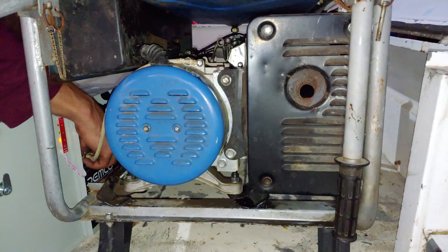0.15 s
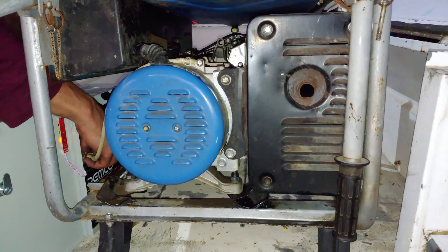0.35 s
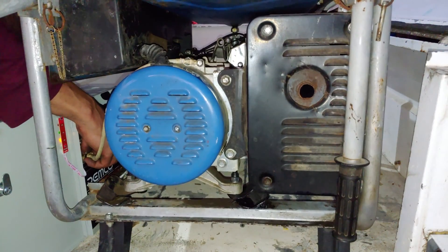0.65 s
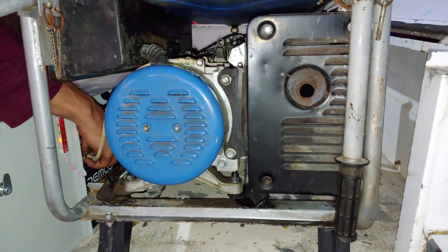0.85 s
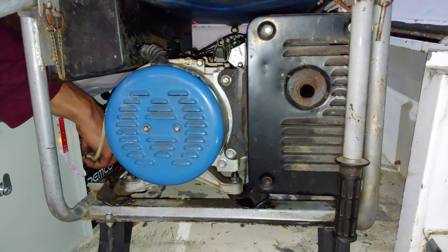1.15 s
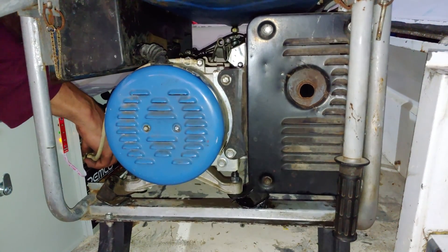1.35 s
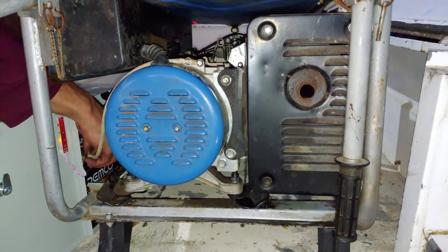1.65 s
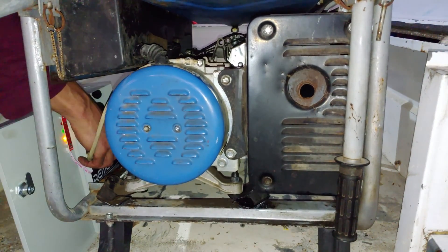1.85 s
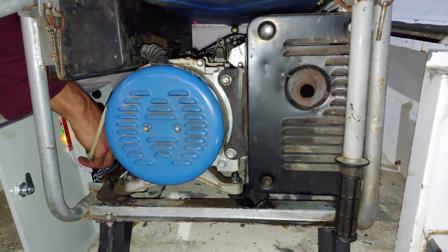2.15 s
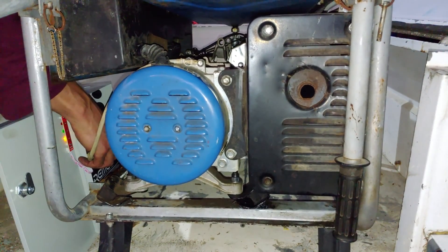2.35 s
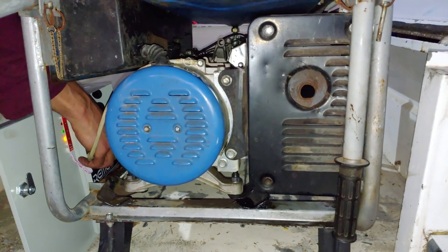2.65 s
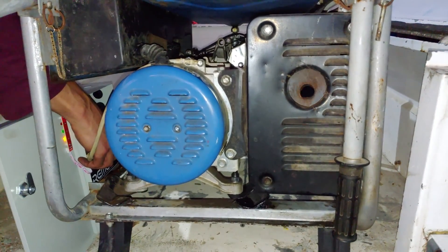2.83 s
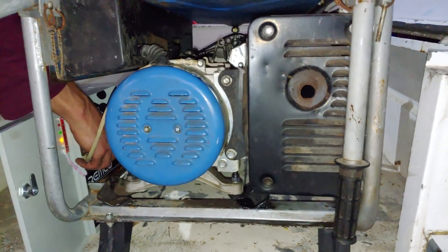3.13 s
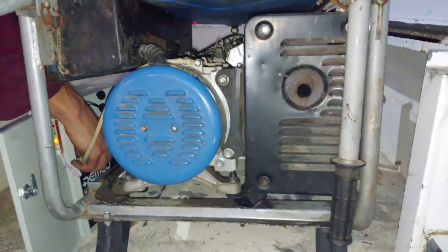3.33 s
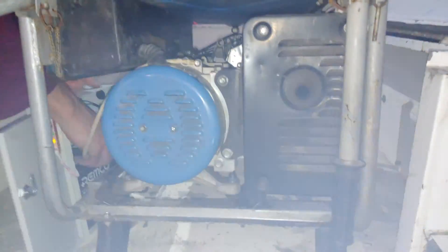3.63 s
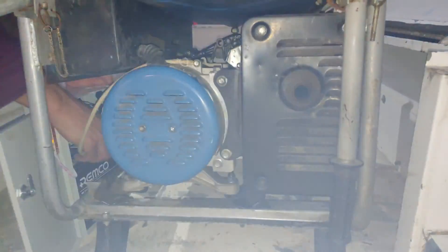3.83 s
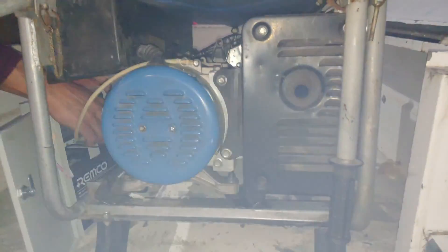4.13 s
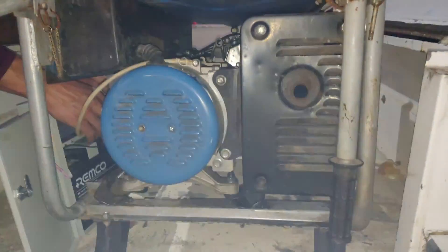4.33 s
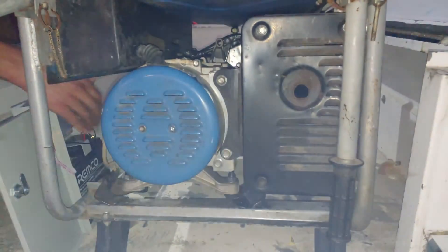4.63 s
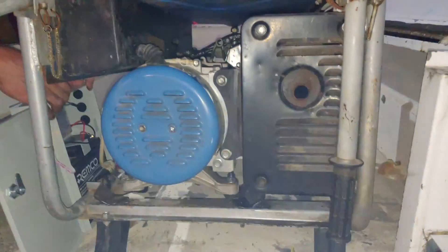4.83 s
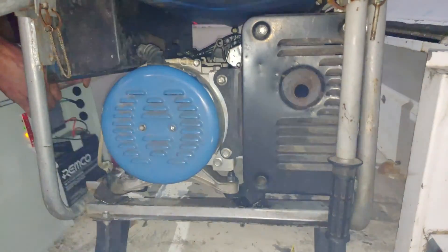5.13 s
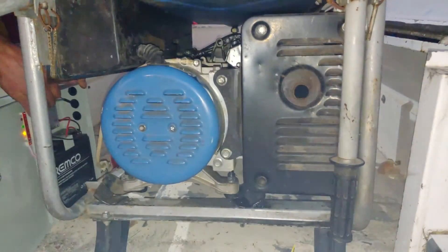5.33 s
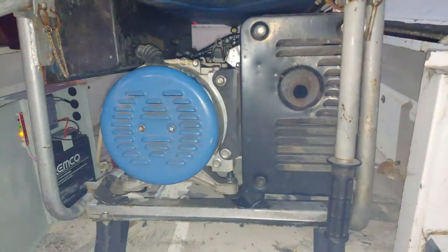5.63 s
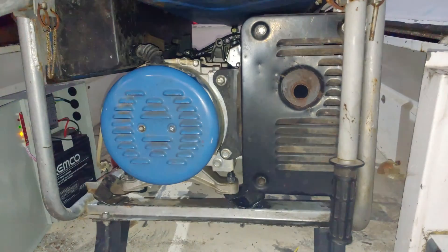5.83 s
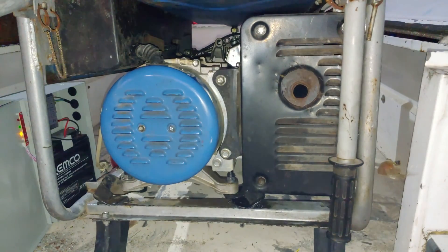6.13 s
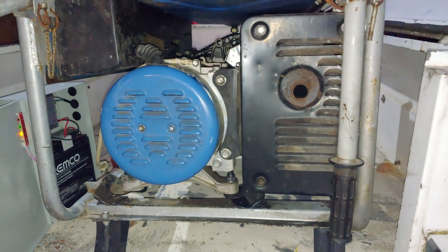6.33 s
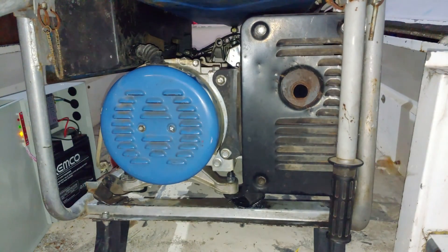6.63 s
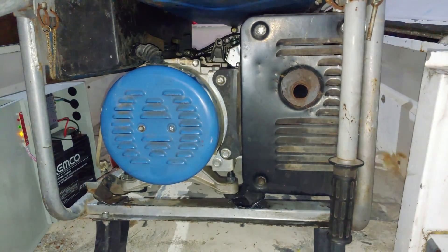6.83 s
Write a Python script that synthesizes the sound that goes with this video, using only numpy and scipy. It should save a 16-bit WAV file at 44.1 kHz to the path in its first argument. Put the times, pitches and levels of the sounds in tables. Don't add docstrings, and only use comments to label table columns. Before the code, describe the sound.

Close up outdoors, a starter motor cranks twice before a small engine fires, blasts buffeting exhaust puffs, misfires, then settles into a steady rapid run.

```python
import sys
import numpy as np
from scipy import signal
from scipy.fft import rfft, irfft, next_fast_len
from scipy.io import wavfile
from scipy.ndimage import uniform_filter1d, minimum_filter1d, map_coordinates

SR = 44100
rng = np.random.default_rng(int(sys.argv[2]) if len(sys.argv) > 2 else 0)


def ratio(d):
    e = np.asarray(d, float) / 20
    return 10 ** e


def to_wav(sig):
    pcm = np.clip(np.atleast_2d(sig), -1, 1) * 32767
    pcm = np.round(pcm).astype(np.int16)
    wavfile.write(sys.argv[1], SR, pcm.T)


N = 307818
T = np.arange(N) / SR


def unit(x):
    return x / np.sqrt(np.mean(x ** 2) + 1e-20)


def along(points, hz):
    f, v = np.transpose(points)
    return np.interp(np.log(hz + 1), np.log(f + 1), v)


def curves(rows):
    s, *cols = np.transpose(rows)
    inside = (T > s[0] - 1e-3) & (T < s[-1] + 1e-3)
    on = uniform_filter1d(1. * inside, size=200, mode="nearest")
    return [np.interp(T, s, c) for c in cols] + [on]


def wobble(rate):
    knots = rng.standard_normal(int(N * rate / SR) + 4)
    return unit(map_coordinates(knots, [T * rate]))


def filtered(x, response):
    m = next_fast_len(N + SR // 4)
    return irfft(rfft(x, m) * response(np.fft.rfftfreq(m, 1 / SR)), m)[..., :N]


def shaped(x, spectrum):
    return unit(filtered(x, lambda hz: ratio(along(spectrum, hz))))


def modes(table, f):
    total = 0
    for k, (centre, width, db) in enumerate(table):
        damping = 1j * f * width
        total = total + (-1) ** k * ratio(db) * damping / (centre * centre - f * f + damping)
    return total


def pair(alike):
    a, b = rng.standard_normal((2, N))
    turn = np.arccos(np.clip(alike, 0, 1)) / 2
    return np.array([np.cos(turn) * a + np.sin(turn) * b, np.cos(turn) * a - np.sin(turn) * b])


def bursts(times, db, rise, t60):
    t = np.arange(SR // 5) / SR
    shape = (1 - np.exp(-t / rise)) ** 2 * ratio(-60 * t / t60)
    out = np.zeros(N + len(t))
    starts = (np.asarray(times) * SR).astype(int)
    for start, gain in zip(starts, ratio(db) / shape.max()):
        out[start:start + len(t)] += gain * shape
    return out[:N]


# start in seconds, jet level in dB, puff level in dB, travel of the puff in seconds.
CATCHING = [(3.392, -24.5, -7.5, .026), (3.4642, -25, -4, .023), (3.528, -26.5, 0, .028),
            (3.5895, -25, -4.5, 0.032), (3.6512, -22, 3, 0.019), (3.7061, -28, -5, 0.0266),
            (3.76, -25, -2.5, 0.028), (3.814, -25.5, -4, 0.024), (3.8654, -37, -21, 0.039),
            (3.913, -25.5, -4, 0.017)]
LIMPING = [(4.005, -24, -5.5, .033), (4.0969, -20.5, -6, .023), (4.185, -20, -10.5, 0.0292),
           (4.272, -20.5, -1.5, 0.025), (4.3531, -25, -1, .032), (4.4365, -20.5, -9.5, 0.025),
           (4.52, -24, -10, 0.027), (4.6035, -22.5, -7, 0.037), (4.6445, -25.5, -10, 0.024),
           (4.6836, -25.5, -9.5, .034), (4.7685, -20.5, -8, 0.028), (4.851, -21.5, -8, 0.032),
           (4.9321, -20, -10.5, .031), (5.0149, -20.5, -5.5, .027), (5.0988, -22.5, -8.5, .027),
           (5.18, -22.5, -9.5, .031), (5.2612, -19.5, -8.5, 0.032), (5.342, -23, -12, .03),
           (5.4239, -20.5, -7.5, 0.029), (5.505, -25.5, -13, .034), (5.5859, -21, -5.5, .033),
           (5.6696, -22.5, -7.5, 0.031), (5.707, -22.5, -10, .044), (5.7482, -25, -9.5, 0.047),
           (5.7841, -25.5, -9.5, 0.063), (5.8235, -25.5, -14, 0.048), (5.862, -23.5, -32, 0.066)]


def strokes():
    return np.transpose(CATCHING + LIMPING)


def even_beat():
    firings_per_s, jet_db, rise_db_per_s = 26.15, -27.5, 4.5
    times = np.arange(5.939, N / SR, 1 / firings_per_s)
    scatter_db = 3.8 * rng.standard_normal(len(times))
    return times, jet_db + rise_db_per_s * (times - times[0]) + scatter_db


# time in seconds, level in dB.
THROAT = [
    (3.4, 14.5),
    (4.1, 17),
    (5.5, -2),
    (5.8, -16),
]
# frequency in Hz, level in dB.
JET = [(1500, 4.5), (2500, -2.5), (3300, -5), (4400, -1), (6000, -8), (7600, -6.5), (9200, -18.5),
       (12000, -18.5), (13500, -30), (15500, -22), (17000, -64)]
# frequency in Hz, level in dB.
CASING = [(180, -17.5), (300, -5.5), (344, 0.5), (386, -4), (451, -1), (585, -4), (683, 0.5), (954, -2.5),
          (1060, -0.5), (1330, -5), (1760, -7.5), (1930, -10.5), (2600, -22.5), (3380, -25.5), (5720, -120)]


def exhaust(beat_s, beat_db):
    s, db = strokes()[:2]
    times, level = np.r_[s, beat_s], np.r_[db, beat_db]
    hiss = bursts(times, level - 11.5, rise=0.0022, t60=0.044)
    hiss += bursts(times, level - 13.5, rise=0.016, t60=0.053)
    hiss += bursts(s, db - 6, rise=.0002, t60=.016)
    early = s < 5.65
    second_hiss = bursts(s[early] + 0.05, db[early] - 23, rise=0.003, t60=0.14)

    jet = shaped(pair(0.67) * ratio(1.3 * wobble(900)), JET)
    sizzle_db, dry_db_per_s = 15, -11
    sizzle = filtered(jet, lambda f: 1 / (1 + (8000 / (f + 1)) ** 6))
    jet = jet + ratio(sizzle_db + dry_db_per_s * np.maximum(T - s[0], 0)) * sizzle

    low_db = np.interp(s, *np.transpose(THROAT))
    throat = bursts(s, db + low_db - 21.5, rise=0.006, t60=0.25)
    return (hiss + second_hiss) * jet + throat * shaped(pair(0.54), CASING)


# arrival of the front in seconds, level in dB, left-right difference in dB.
PUMPED = [(0.094, -15, -15.5), (0.213, -6, -7), (0.332, -13, -16), (0.46, -10, -10), (0.579, -8, -6),
          (0.704, -7.5, -1.5), (.826, -7, -6), (0.953, -3, 2), (1.098, -14, -4), (1.203, -6, -3),
          (1.34, -16.5, -13), (1.478, -8.5, 0), (1.59, -7, -2), (1.697, -1.5, 1), (1.829, -11, -2.5),
          (2.726, -14, 8), (2.856, -22.5, 27), (2.936, -16.5, 16), (3.154, -16.5, 26), (3.272, -3.5, 0),
          (3.344, -8.5, -3)]
# time in seconds, level in dB.
STRAY = [
    (6.062, -22.5),
    (6.306, -25),
    (6.413, -19.5),
    (6.463, -27),
    (6.635, -23.5),
    (6.754, -22),
]


def puffs():
    cold_sharp_db, hot_sharp_db, sharp_scatter_db, lean_scatter_db = -15.5, -3.5, 2, 2.5
    s, _, db, travel = strokes()
    cold_s, cold_db, cold_lean = np.transpose(PUMPED)
    late_s, late_db = np.transpose(STRAY)
    hot_s, hot_db = np.r_[s + travel, late_s], np.r_[db, late_db]
    draw = rng.standard_normal((len(cold_s) + len(hot_s), 2))
    lean = np.r_[cold_lean, -.8 + lean_scatter_db * draw[len(cold_s):, 0]]
    sharp = np.r_[cold_sharp_db + 0 * cold_s, hot_sharp_db + 0 * hot_s]
    sharp = sharp + sharp_scatter_db * draw[:, 1]
    return np.r_[cold_s, hot_s], np.r_[cold_db, hot_db], lean, sharp


def swirls(s, db, lean_db, sharp_db, alike):
    t = np.arange(SR // 12) / SR
    swell = (t / 0.01) ** 2 * np.exp(2 - 2 * t / 0.0098)
    draw = rng.standard_normal((len(s), 6))
    out = np.zeros((2, N + len(t)))
    for row in range(len(s)):
        start = int((s[row] - .008) * SR)
        for port, side in enumerate((.5, -.5)):
            own = (1 - alike[row]) * draw[row, 3 + port]
            pitch_db = 0.363 * min(sharp_db[row], -3) + 1.68 * draw[row, 0] + 1.5 * own
            hz = 55 + 520 * ratio(pitch_db) * np.exp(-t / 0.00818)
            phase = 2 * np.pi * np.cumsum(hz) / SR + 2 * draw[row, 1] + 0.93 * own
            gain = ratio(db[row] + side * lean_db[row] - 2.0)
            out[port, start:start + len(t)] += gain * swell * np.sin(phase)
    return out[:, :N]


# time in seconds, left-right likeness from 0 to 1.
PUFF_ALIKE = [
    (0, 0.31),
    (3.2, 0.51),
    (3.8, 0.15),
    (4.8, 0.98),
    (6.98, 0.85),
]
# frequency in Hz, level in dB.
THUD = [(15, -35.5), (35, -4), (70, -1.5), (120, -5), (200, -10), (350, -24.5), (700, -66)]
# frequency in Hz, level in dB.
SNAP = [(100, -32), (220, 0.5), (350, -1), (550, -8), (900, -13), (1600, -34.5), (4000, -72.5)]
# time in seconds, level in dB.
DRAUGHT = [
    [(0.0, -29), (1.8, -35.5), (1.9, -65)],
    [(2.6, -41), (3.1, -24.5), (3.2, -21), (3.33, -12), (3.37, -23.5), (3.6, -12.5), (4.6, -21),
     (5.75, -17.5), (6.1, -36), (6.55, -26.5), (6.98, -29)],
]


def buffet():
    s, db, lean_db, sharp_db = puffs()
    alike = curves(PUFF_ALIKE)[0]
    thud = shaped(pair(alike) * ratio(2.5 * wobble(70)), THUD)
    snap = shaped(pair(alike) * ratio(3.0 * wobble(120)), SNAP)
    thud = unit(thud + 0.17 * filtered(thud ** 2, lambda f: f / (f + 40)))
    slow, quick = [], []
    for side in (.5, -.5):
        port_db = db + side * lean_db
        slow.append(bursts(s - .004, port_db - 6, rise=0.004, t60=0.1))
        quick.append(bursts(s - .004, port_db + sharp_db - 4.5, rise=0.0015, t60=0.099))
    rest = sum(on * ratio(level + 4) for level, on in map(curves, DRAUGHT))
    ring = swirls(s, db, lean_db, sharp_db, alike[(s * SR).astype(int)])
    stroke_s = strokes()[0]
    lull = bursts(stroke_s - .018, 0 * stroke_s, rise=.012, t60=.2)
    calm = 1 - .87 * np.minimum(lull, 1)
    return ring + calm * (np.array(slow) + rest) * thud + (np.array(quick) + 0.21 * calm * rest) * snap


def rings(table, rise, t60, sag):
    t = np.arange(SR // 20) / SR
    out = np.zeros(N + len(t))
    shape = (1 - np.exp(-t / rise)) * ratio(-60 * t / t60)
    shape = shape / shape.max()
    for (s, db, hz), chance in zip(table, rng.random(len(table))):
        turns = np.cumsum(hz * np.exp(-sag * t)) / SR
        out[int(s * SR):][:len(t)] += ratio(db) * shape * np.sin(2 * np.pi * (turns + chance))
    return out[:N]


# start in seconds, peak in dB, pitch in Hz.
SLAPS = [(3.414, -8.5, 301), (3.485, -14, 428), (3.554, -5.5, 312), (3.613, -9, 301), (3.669, 1, 540),
         (3.728, -17, 306), (3.786, -15, 390), (3.835, -17.5, 430), (3.901, -22, 452), (3.944, -15, 323),
         (3.997, -18.5, 477), (4.037, -11, 410), (4.088, -17, 473), (4.117, -16, 308), (4.21, -10, 401),
         (4.293, -7, 420), (4.34, -17, 370), (4.381, -16, 511), (4.44, -27, 328), (4.461, -13, 301),
         (4.546, -27, 357), (4.614, -20, 356), (4.639, -19, 490), (4.666, -15, 304), (4.716, -13.5, 383),
         (4.793, -16, 365), (4.885, -9.5, 338), (4.959, -13, 380), (5.041, -9, 360), (5.108, -27, 355),
         (5.126, -13.5, 370), (5.209, -9.5, 316), (5.295, -5, 318), (5.347, -28, 1050), (5.371, -10, 457),
         (5.456, -9, 425), (5.536, -12, 470), (5.604, -12.5, 318), (5.67, -26, 331), (5.695, -21, 510),
         (5.739, -21.5, 345), (5.79, -20, 367), (5.83, -19, 347), (5.895, -24, 520)]
# start in seconds, peak in dB, pitch in Hz.
PIPE = [(3.4632, -25, 1180), (3.5302, -27, 1117), (3.564, -18, 1150), (3.7683, -34, 1285),
        (3.9143, -22, 1290), (4.0091, -16, 1290), (4.0689, -23, 1270), (4.098, -13, 1270),
        (4.1852, -17, 1250), (4.2111, -16, 1130), (4.2435, -27, 1340), (4.271, -21, 1300),
        (4.3584, -20, 1174), (4.463, -25, 1320), (4.493, -29, 1153), (4.6042, -33, 1245),
        (4.7394, -24, 1250), (4.7698, -19, 1220), (4.8516, -21, 1176), (4.9345, -23, 1250),
        (5.0154, -18.5, 1147), (5.2617, -19, 1126), (5.3735, -17, 1100), (5.4222, -22, 1224),
        (5.4867, -33, 1180), (5.585, -27, 1200), (5.609, -16.5, 1450), (5.6676, -23, 1180),
        (5.8718, -21, 1280), (5.9013, -26, 1100)]


def knocks():
    fronts = [(s, db, 1.573 * hz) for s, db, hz in SLAPS]
    shared = rings(fronts, rise=.0003, t60=.028, sag=70)
    own = rings(fronts, rise=.0003, t60=.028, sag=70)
    slap = np.array([shared + 0.38 * own, shared - 0.44 * own])
    return ratio(1.0) * slap + ratio(-3.0) * rings(PIPE, rise=0.00067, t60=0.045, sag=1.5)


def armature():
    stroke = (T - .19) / .2475 % 1
    sag = uniform_filter1d(np.exp(-stroke / .4), size=900)
    turns_per_s = 60.8 - 7 * sag + .3 * wobble(10)
    return np.cumsum(turns_per_s) / SR


# frequency in Hz, left-right difference in dB.
STARTER_LEAN = [(60, -2.5), (110, -7), (190, 4), (350, -1), (620, -1.5), (1120, -5), (2010, 5),
                (3620, -3.5), (6490, 6.5), (11700, -3.5)]
# frequency in Hz, left-right difference in radians.
STARTER_LEAD = [(1500, 0), (1810, .3), (2580, -1.4), (3620, 2), (4050, -.3), (5680, .4), (6550, 2.5),
                (8100, 0), (10600, 3)]


def place(f):
    side = np.array([[.5], [-.5]])
    return ratio(side * along(STARTER_LEAN, f)) * np.exp(1j * side * along(STARTER_LEAD, f))


# frequency in Hz, width in Hz, level in dB.
HOUSING = [(408, 30, -12), (530, 15, -15), (770, 60, -5.5), (842, 30, -7), (905, 40, -11), (1046, 28, -8),
           (1266, 16, -5), (1552, 11, 1.5), (1605, 28, -5), (1739, 17, 4), (1833, 18, -2), (2100, 40, -14),
           (2379, 26, -11)]
# frequency in Hz, level in dB.
BROAD = [(200, -49), (380, -20), (600, -17), (1000, -13), (2000, -15), (2500, -16.5), (3600, -45.5)]


def housing(f):
    return place(f) * (modes(HOUSING, f) * f ** 2 / (f ** 2 + 350 ** 2) + ratio(along(BROAD, f)))


# frequency in Hz, width in Hz, level in dB.
RATTLE = [(3140, 30, -1), (3215, 40, 0), (3430, 40, -1), (3706, 35, -3), (3880, 140, -2), (4230, 51, -4),
          (4690, 90, -3), (5100, 35, -4), (5562, 50, -1.5), (5666, 40, -1), (5930, 43, -9), (6540, 120, 0),
          (6900, 52, -5), (7710, 60, -9)]
# frequency in Hz, level in dB.
BROAD_HIGH = [(2000, -54), (2800, -17), (5000, -18), (8000, -20.5), (11500, -29), (12400, -56),
              (14500, -24), (16000, -79.5)]


def rattle(f):
    floor_db = along(BROAD_HIGH, f)
    return place(f) * (modes(RATTLE, f) * ratio(floor_db + 12.0) + ratio(floor_db))


def first_try(body, bright):
    let_go_s, coast_db_per_s = 1.783, -130
    stop_s, stop_db_per_s = 1.903, -9000
    fade_s, fade_db_per_s = 1.86, -53
    level_db = -16.5 - 0.75 * T
    level_db = level_db + coast_db_per_s * np.maximum(T - let_go_s, 0)
    level_db = level_db + stop_db_per_s * np.maximum(T - stop_s, 0)
    bright_db = -2.5 + fade_db_per_s * np.maximum(T - fade_s, 0)
    return ratio(level_db) * (body + ratio(bright_db) * bright)


# time in seconds, housing level in dB, bright rattle relative to it in dB.
SECOND_TRY = [
    (2.3, -39.5, -9),
    (2.34, -27.5, -18),
    (2.62, -23.5, -2.5),
    (2.71, -23, -10),
    (2.93, -25, -10.5),
    (3.12, -22, -8.5),
    (3.33, -20.5, -13.5),
    (3.35, -60, -15),
    (3.4, -32.5, -5.5),
]
# time in seconds, surge over the grind in dB.
KICKS = [
    (2.955, 1),
    (3.098, 2),
    (3.228, -9),
    (3.303, 2),
]
# frequency in Hz, level in dB.
LOADED = [(400, 3), (770, 1.5), (1000, 5.5), (1400, -2), (1750, -5), (2200, -5.5)]
# frequency in Hz, level in dB.
SCRAPE = [(2000, -50), (2800, -13), (4000, -12.5), (5000, -17.5), (6500, -11.5), (8000, -21), (11500, -34),
          (12400, -60.5)]


def second_try(body, bright):
    db, bright_db, on = curves(SECOND_TRY)
    shaking = ratio(3.3 * wobble(40) + 2.5 * wobble(150))
    smeared = body + 0.82 * shaped(pair(0.73) * shaking, BROAD)
    skid = shaped(pair(0.44) * ratio(1.9 * wobble(90)), SCRAPE)
    surge = 1 + bursts(*np.transpose(KICKS), rise=.01, t60=.14)
    low = surge * shaped(smeared, LOADED)
    return on * ratio(db + 1.5) * (low + ratio(bright_db + 1.5) * unit(bright + 1.36 * skid))


# time in seconds, peak in dB, bright part relative to it in dB.
CLANKS = [(2.165, -47.5, -16), (2.189, -54, -11), (2.217, -45.5, -10.5), (2.273, -5.5, -15),
          (2.291, 2.5, -17), (2.309, -14.5, -38), (2.75, -8, -14.5), (2.778, -6.5, -18), (2.961, -11, -12),
          (3.108, -18, -29), (3.289, -18, -7.5), (3.307, -10, -4.5), (3.323, -31, -21)]


def clanks():
    blow = pair(0.11)
    struck, ping = shaped(filtered(blow, housing), LOADED), unit(filtered(blow, rattle))
    s, db, bright_db = np.transpose(CLANKS)
    low = bursts(s, db - 12.0, rise=0.0042, t60=0.1) * struck
    return low + bursts(s, db + bright_db - 1.0, rise=0.0011, t60=0.07) * ping


def starter():
    turns = armature()
    turn = 2 * np.pi * turns
    knock = unit(np.diff(np.floor(turns), prepend=0) * ratio(2.5 * wobble(43.98)))
    knock = filtered(knock, lambda f: .3 + 1.9 / (1 + ((f - 775) / 55) ** 2))
    throb_db = 0.36 * np.cos(turn) + 0.5 * np.cos(2 * turn)
    throb = ratio(throb_db + 0.79 * wobble(10.92) + 1.34 * wobble(400))
    body = unit(filtered(pair(0.43) * throb + knock * (T < 2), housing))
    bright = unit(filtered(pair(0.55) * throb * ratio(1.5 * wobble(120)), rattle))
    return first_try(body, bright) + second_try(body, bright) + clanks()


# time in seconds, tooth rate in Hz, level in dB.
WHINE = [
    (2.35, 245, -38),
    (2.456, 414, -24.5),
    (2.534, 536, -23.5),
    (2.6, 625, -22),
    (2.66, 695, -20),
    (2.708, 672, -19),
    (2.745, 677, -42),
]
# frequency in Hz, level in dB.
GEARBOX = [(410, 0), (540, -3), (720, 1), (1000, 1), (1300, -4), (2000, -5), (2600, -22), (3500, -21),
           (4000, -11), (4500, -15), (5000, -11), (6300, -17)]


def whine():
    hz, level_db, on = curves(WHINE)
    span = on > 0
    hz = uniform_filter1d(hz, size=1200)[span]
    phase = 2 * np.pi * np.cumsum(hz) / SR
    size_db, waver = 4.5 * wobble(50), wobble(110)
    tone = np.zeros(N)
    for half in range(2, 19):
        k = half / 2
        start = half * SR // 4
        own = slice(start, start + len(hz))
        uneven_db = -11 * (half % 2)
        gain = ratio(along(GEARBOX, k * hz) + size_db[own] + uneven_db)
        tone[span] += gain * np.sin(k * phase + (.65 + .1 * k) * waver[own])
    return on * ratio(level_db - 2.0) * tone * ratio([[.3], [-.3]])


# time in seconds, level in dB, pitch in Hz, time to fade by 60 dB in seconds.
RELAY = (1.908, -49, 2100, .045)


def relay():
    s, db, hz, t60 = RELAY
    return bursts([s], np.array([db]), rise=0.00083, t60=t60) * np.sin(2 * np.pi * hz * T)


# time in seconds, casing level in dB.
BLOCK = [
    (3.3, -37),
    (3.55, -36.5),
    (4.1, -31),
    (4.65, -32),
    (5.15, -27.5),
    (5.9, -27.5),
    (6.3, -27),
    (6.98, -23.5),
]
# frequency in Hz, level in dB.
FAN = [(1290, -9.5), (2200, -5), (2970, -9), (3950, -8.5), (4300, -11.5), (5600, -16), (6060, -19),
       (7670, -21), (9230, -34), (12100, -34), (15700, -55), (22000, -120)]
# frequency in Hz, width in Hz, level in dB.
MUFFLER = [(171, 33, -1.5), (340, 49, -15), (503, 51, -12.5), (700, 69, -34), (1057, 19, -0.5),
           (1204, 140, -10)]


def block(beat_s):
    low_db, on = curves(BLOCK)
    fan_db = -41.5 + 0.91 * (low_db + 31.5) + 4 * np.tanh(4 * (T - 5.84))
    pulse = 1 + .5 * bursts(beat_s, 0 * beat_s, rise=0.0036, t60=0.48)
    grain = ratio(1.1 * wobble(300) + 0.5 * wobble(15))
    roar = ratio(low_db - 1.0) * shaped(pair(0.99) * grain * pulse, CASING)
    sizes = ratio(3.3 * rng.standard_normal(len(beat_s)))
    firings = np.bincount((beat_s * SR).astype(int), sizes, N)
    gas = pair(.97) * pulse + 55 * firings
    drone = unit(filtered(gas, lambda f: modes(MUFFLER, f) / (1 + (f / 1500) ** 4)))
    rush = shaped(pair(0.93) * ratio(0.71 * wobble(600)), FAN)
    return on * (roar + ratio(low_db - 3.0) * drone + ratio(fan_db - 1.3) * rush)


# time in seconds, level in dB.
YARD = [
    (1.88, -59),
    (1.95, -54),
    (2.13, -55.5),
    (2.19, -45),
    (2.4, -39),
    (2.72, -52),
]
# frequency in Hz, level in dB.
QUIET = [(20, -20), (65, 0), (150, -5), (300, -11), (600, -23), (1000, -31), (2000, -46), (4000, -70)]


def yard():
    db, on = curves(YARD)
    return on * ratio(db + 2.7 * wobble(29.76)) * shaped(pair(0.94), QUIET)


def scene():
    beat_s, beat_db = even_beat()
    engine = exhaust(beat_s, beat_db) + buffet() + knocks() + block(beat_s)
    return engine + starter() + whine() + relay() + yard()


def band_limit(x):
    return signal.sosfilt(signal.butter(12, 16300, fs=SR, output="sos"), x)


# frequency in Hz, level in dB.
MICROPHONE = [(9000, 0), (11800, 0), (12400, -10), (13400, -10), (14300, -4), (15600, -5), (16200, -12)]


def record(dry):
    need = np.minimum(1, 0.73 / np.maximum(np.abs(dry).max(axis=0), 1e-9))
    gain = uniform_filter1d(minimum_filter1d(need, size=300), size=300)
    heard = filtered(dry * gain, lambda f: ratio(along(MICROPHONE, f)))
    return band_limit(heard)


dry = scene()
out = record(dry)
to_wav(out)
```